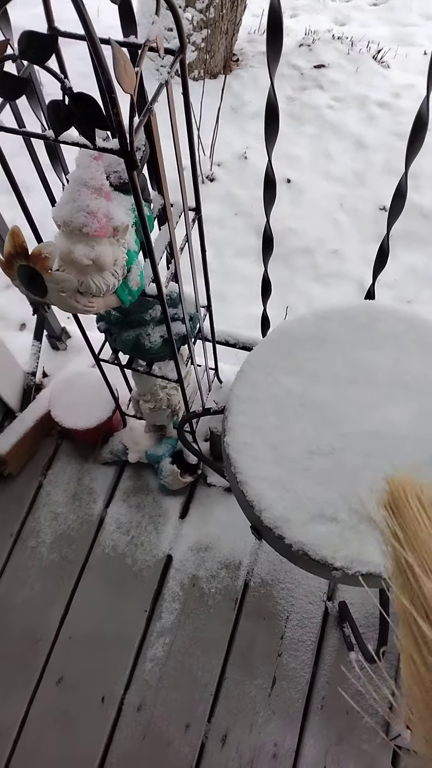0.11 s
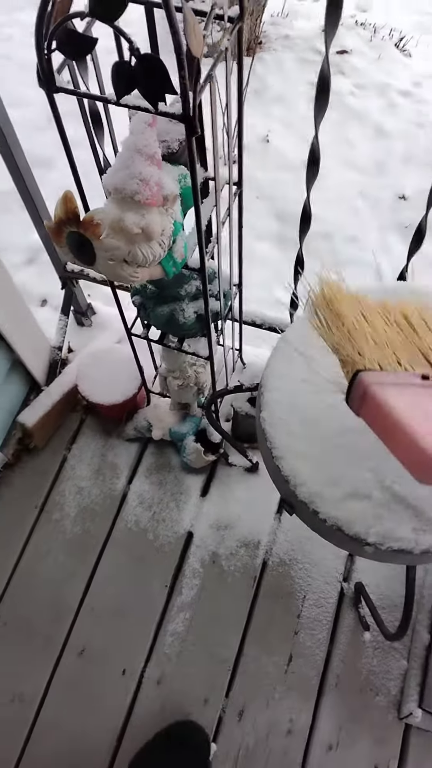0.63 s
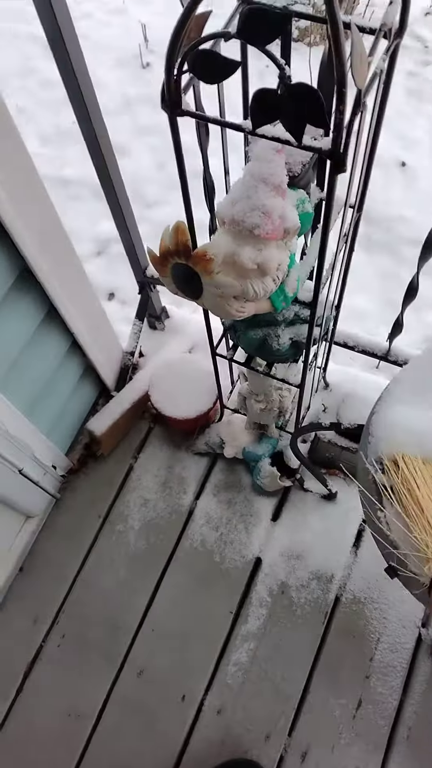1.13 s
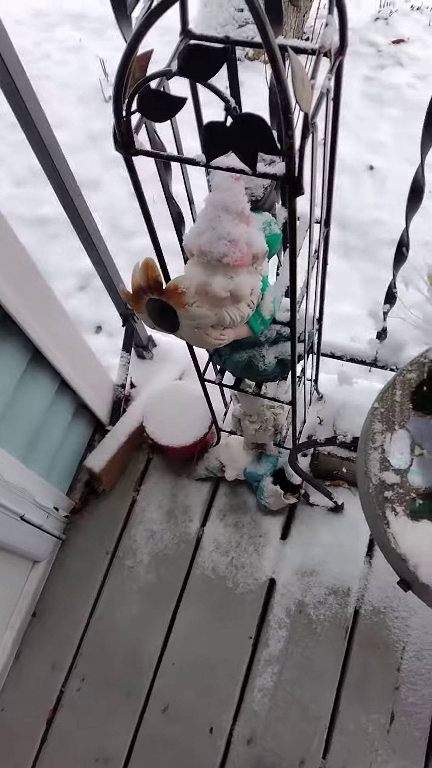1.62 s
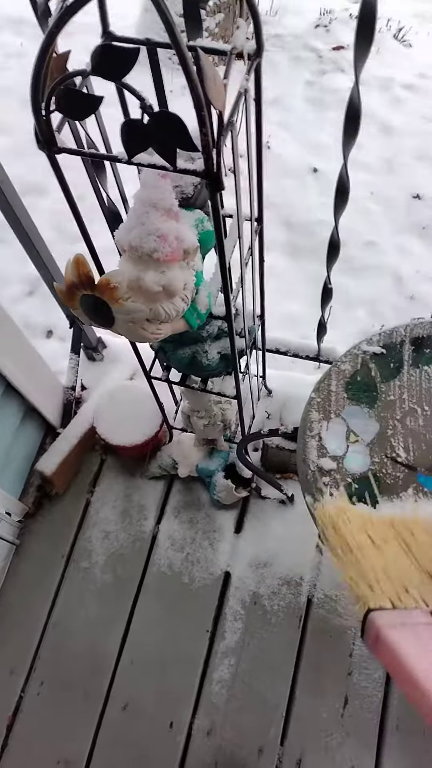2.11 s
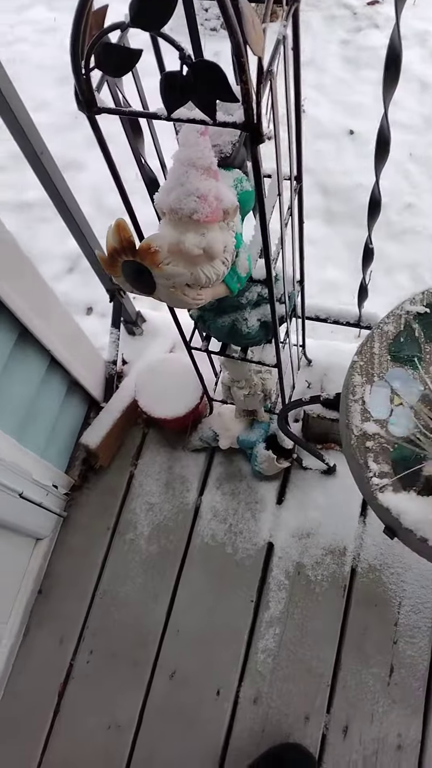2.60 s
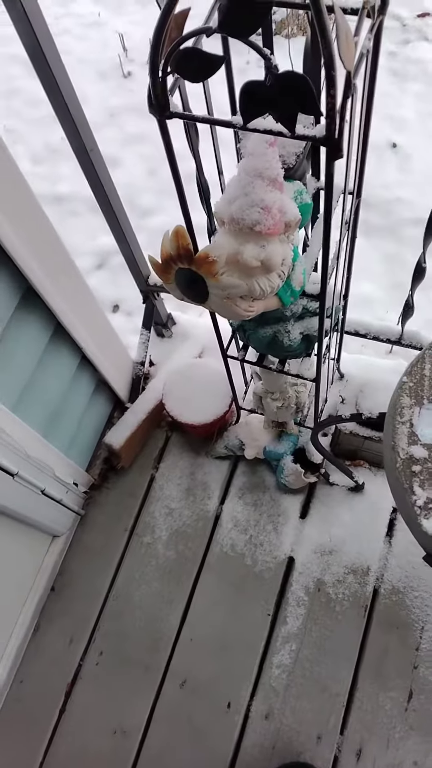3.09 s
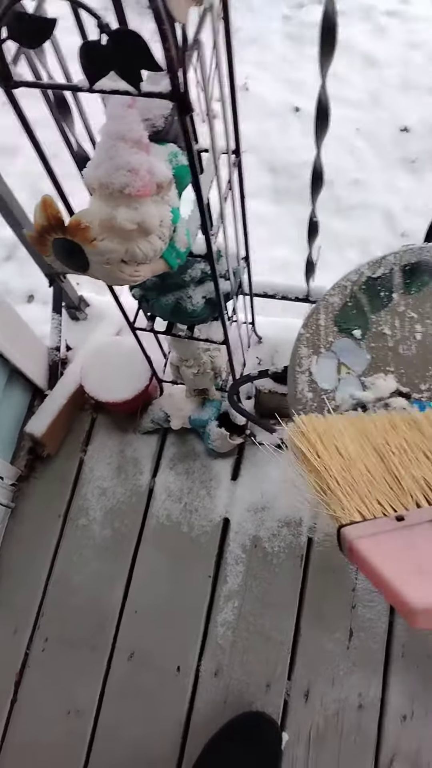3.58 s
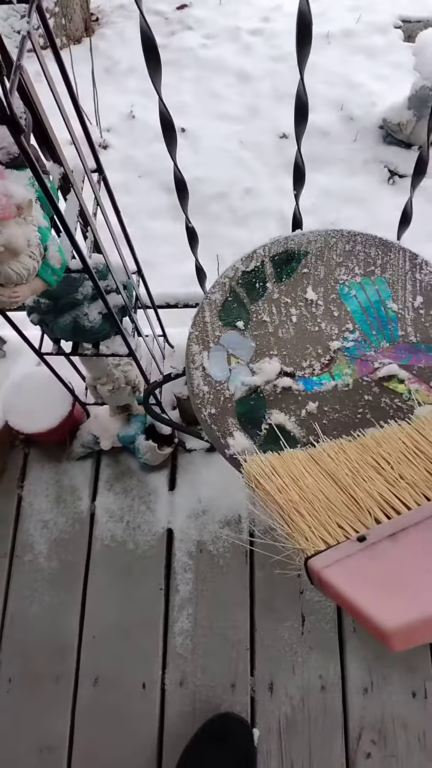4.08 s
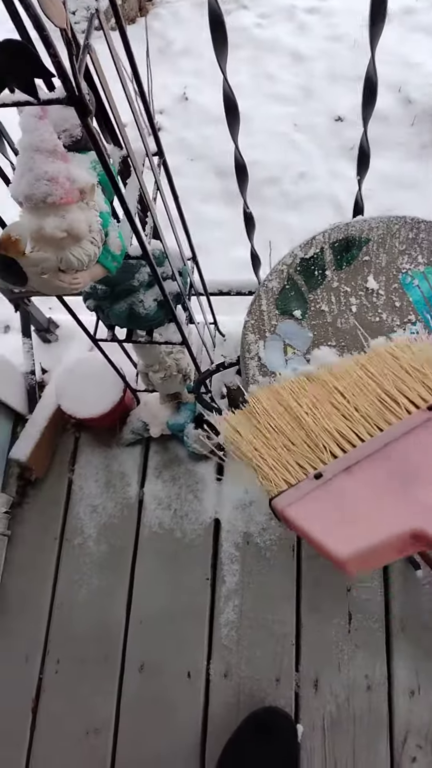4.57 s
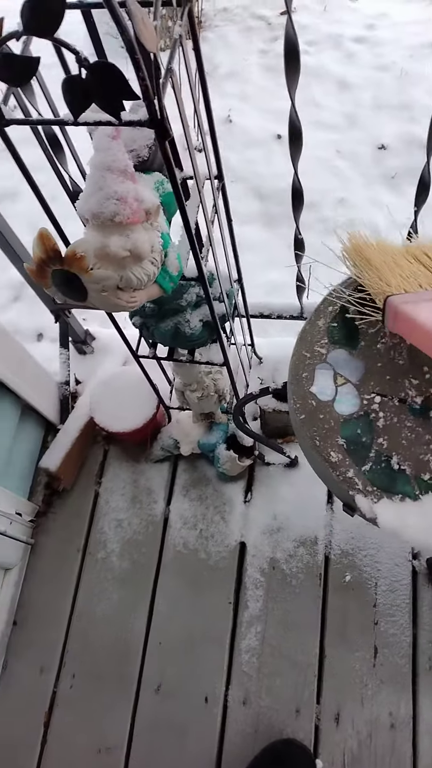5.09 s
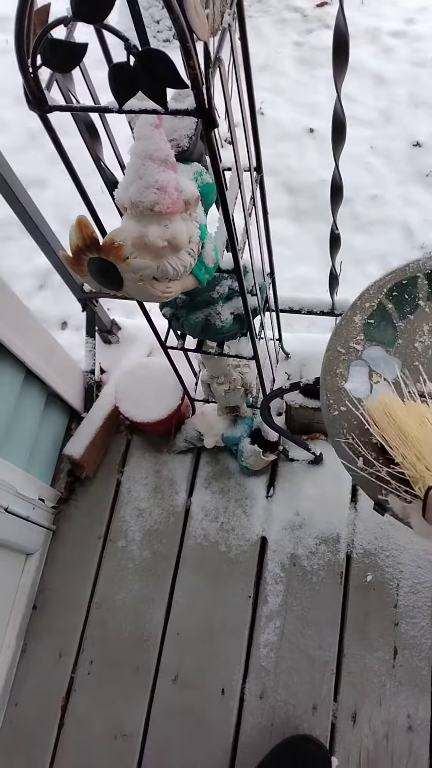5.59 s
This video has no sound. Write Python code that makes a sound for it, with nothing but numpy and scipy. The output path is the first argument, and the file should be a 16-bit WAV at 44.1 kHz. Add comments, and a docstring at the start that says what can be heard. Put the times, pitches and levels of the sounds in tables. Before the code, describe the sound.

Outdoors on a snowy wooden deck, heard close and dry through a stereo phone, over very quiet air and a faint wavering rumble. Straws barely rustle at first; a boot thuds softly on the boards at 0.6 s with a short snow scuff. From 0.9 s the broom brushes the table, building in uneven scratchy dabs to a sharp, crackling peak around 1.5 s, then dropping away by 1.7 s. A faint rasp begins near 2.1 s; the second sweep swells from 2.5 s, strongest around 2.9 s, with dull hollow tabletop knocks, snapping straws and a tiny falling squeak, fading by 3.2 s. Light soft dabs follow at 3.6 and 3.8 s. The third sweep runs from 4.3 to 5.1 s, a fuller steady hiss and snow crunch with a sharp snap at 4.75 s and a low puff of air, mostly left, near 5.0 s. A gentle flick comes at 5.5 s, with rustle rising at the end.

```python
"""On a wooden deck in winter, a straw broom sweeps snow off a small tiled metal table, at arm's length from a phone.
Thousands of random straw ticks make the hiss and the crunch of snow, coloured at each microphone port.
Drag and blows of the broom ring the modes of the table top; a foot rings those of the boards, its sole scuffing
snow. A puff of air reaches mostly the left port, straws squeak, and behind it lies a quiet, wavering rumble."""
import sys
import numpy as np
from scipy import signal
from scipy.fft import rfft, irfft
from scipy.io import wavfile
from scipy.ndimage import uniform_filter1d

SR = 44100
rng = np.random.default_rng(int(sys.argv[2]) if len(sys.argv) > 2 else 0)


def volts(x):
    """Linear amplitude factor 10**(x/20) for a level x in dB, scalar or array-like."""
    e = np.asarray(x, float) / 20
    return 10 ** e


def store_pcm(level_fs):
    """Save levels as 16-bit WAV."""
    pcm = np.round(np.clip(level_fs, -1, 1) * 32767).astype(np.int16)
    wavfile.write(sys.argv[1], SR, np.atleast_2d(pcm).T)


N = 251193

# Treble colour of the two microphone ports. Each row: frequency in Hz, left gain in dB, right gain in dB.
PORT_COLOUR = [(1800, -49, -50.5), (3293, -18, -18), (5056, -16, -14.5), (7060, -13.5, -8), (8014, -11, -8),
               (9940, -3.5, -8.5), (10920, 1, -13.5), (11640, -0.5, -11.5), (13290, -3, -26),
               (15590, -6.5, -15.5)]


def colour(x, hz, db):
    """Filter by a spectrum joined on a log-frequency axis."""
    log_hz = np.log(np.maximum(np.fft.rfftfreq(N, 1 / SR), 1))
    gain = volts(np.interp(log_hz, np.log(hz), db))
    return irfft(rfft(x) * gain, N)


def unit(x):
    """Scale so that the mean of the channels has rms 1."""
    middle = np.mean(np.atleast_2d(x), axis=0)
    return x / np.sqrt(np.mean(middle ** 2))


def curves(rows):
    """Columns of a table of times and values, joined by straight lines at every sample."""
    s, *columns = np.transpose(rows)
    return [np.interp(np.arange(N) / SR, s, column) for column in columns]


def walk(rate):
    """Random levels held 1 / rate s and slewed twice; spread near 1."""
    hold = int(SR / rate)
    steps = np.repeat(rng.standard_normal(N // hold + 1), hold)
    return 1.267 * uniform_filter1d(uniform_filter1d(steps, hold), hold)[:N]


def ring(x, hz, t60):
    """One mode: a decaying sine that falls 60 dB in t60 s after each push."""
    pole = np.exp(2j * np.pi * hz / SR - np.log(1000) / (t60 * SR))
    return signal.lfilter([1], [1, -pole], x).imag


def thumps(rows):
    """Soft, damped low rings."""
    out = 0
    for s, db, hz, t60 in rows:
        push = volts(db) * (np.arange(N) == int(s * SR))
        out = out + ring(push, hz, t60)
    return signal.sosfilt(signal.butter(3, (45, 850), "band", fs=SR, output="sos"), out)


def slips(count, scatter_db, lag_s):
    """Random ticks spread across the broom: each reaches the right port with its own lag."""
    at = rng.integers(0, N, count)
    spread = np.minimum(rng.exponential(size=count), 4)
    size = rng.standard_normal(count) * volts(scatter_db * spread)
    lag = np.round(lag_s * SR * rng.standard_normal(count)).astype(int)
    late = np.clip(at + lag, 0, N - 1)
    return np.array([np.bincount(k, size, N) for k in (at, late)])


def bunches(count, depth, fade_s):
    """Straws let go in bunches: sudden swells that die away."""
    size = np.minimum(rng.exponential(size=count), 3)
    kicks = np.bincount(rng.integers(0, N, count), size, N)
    return 1 + depth * signal.lfilter([1], [1, -np.exp(-1 / (fade_s * SR))], kicks)


def patchy(x, low_hz, count, patch_db, rate, favour_hz=1., favour_db=0.):
    """Uneven colour: each sixth-octave band of the straw and snow noise wavers on its own."""
    edges = low_hz * 2 ** (np.arange(count + 1) / 6)
    out = 0
    for lo, hi in zip(edges, edges[1:]):
        octaves_off = np.log2(np.sqrt(lo * hi) / favour_hz)
        lift_db = favour_db * np.exp(-(octaves_off / 0.197) ** 2)
        band = signal.sosfilt(signal.butter(1, (lo, hi), "band", fs=SR, output="sos"), x)
        out = out + volts(lift_db + patch_db * walk(rate)) * band
    return out


def through_ports(x):
    """Each port has its own treble resonance."""
    hz, *port_db = np.transpose(PORT_COLOUR)
    return np.array([colour(v, hz, db) for v, db in zip(x, port_db)])


def outdoors():
    """Still winter air, unrelated at the ports, with a wavering rumble mostly common to both."""
    # Spectrum of the still air. Each row: frequency in Hz, relative level in dB per Hz.
    air_colour = [(15, -23.5), (25, -0.5), (129, -5.5), (250, -8), (330, -4), (480, -16.5), (690, -3.5),
                  (850, -5.5), (1020, -21.5), (1230, -5.5), (1600, -13), (2100, -15), (2380, -11),
                  (2800, -16), (5280, -75.5), (9810, -22.5), (11500, -23.5), (15500, -58)]
    # Distant low rumble. Each row: time in seconds, level in dB about which it wavers.
    rumble_level = [(0, -75.5), (.2, -78.5), (.35, -71), (.57, -74), (1.22, -77), (1.62, -72), (2.1, -69.5),
                    (2.35, -75.5), (2.66, -68.5), (3.27, -77), (3.66, -70.5), (4.4, -81.5), (5.12, -70.5),
                    (5.7, -78.5)]
    air = colour(rng.standard_normal((2, N)), *np.transpose(air_colour))
    left = colour(air[0], [6000, 12000], [0, 3])
    right = colour(air[1], [6000, 12000], [0, -9])
    low = colour(rng.standard_normal((3, N)), [20, 45, 75, 120, 160, 210, 290],
                 [-26, 6.5, 10, 8, 4.5, 0.5, -29.5])
    shared = unit(low[0] + 0.19 * low[1:])  # each port adds a little rumble of its own
    rumble = shared * volts(curves(rumble_level)[0] + 2.0 * walk(7.9))
    return volts(-77) * unit(np.array([left, right])) + rumble


def puff():
    """Eddies of air from the swing: short, unsteady low rings, mostly at the left port."""
    # Bursting eddies. Each row: start in seconds, level in dB before flutter and port share, pitch in Hz.
    eddies = [(4.962, -40, 89), (4.991, -32.5, 115), (4.993, -37.5, 264), (5.024, -42, 100),
              (5.012, -37.5, 187), (5.043, -38, 125.7), (5.07, -45, 80), (5.1, -41, 87.3)]
    cycles = 10.0  # turns until 60 dB down
    rings = thumps([(s, db, hz, cycles / hz) for s, db, hz in eddies])
    return np.array([[.9], [.1]]) * rings * volts(2.0 * walk(90))


def thuds():
    """Deck boards ring under a foot, alike at both ports."""
    # Heel, rocking sole and toe. Each row: start in seconds, level in dB, brightness in dB per octave.
    steps = [(.622, -43.5, 5), (.637, -45.5, 0.5), (.65, -53.5, -3.5), (.668, -62, -1.5), (.7, -72, -7),
             (.735, -77, -10), (.764, -73, -11.5), (.792, -73, -10.5)]
    # Modes of the deck boards. Each row: frequency in Hz, relative level in dB, 60 dB decay in seconds.
    board = [(93.5, -3, 0.1), (134.6, -5, 0.101), (359.4, -12, 0.23), (394.4, -1, 0.103),
             (631.4, 1, 0.0544), (225, -9, 0.07), (500, -9, 0.06)]
    rows = []
    for s, db, tilt_db in steps:
        for hz, mode_db, t60 in board:
            octaves = np.log2(hz / board[3][0])
            rows.append((s, db + mode_db + tilt_db * octaves, hz, t60))
    return thumps(rows)


def scuffs():
    """Grains of snow crushed under the sole on the boards."""
    # Grinding of the sole. Each row: start in seconds, peak level in dB, seconds to fall 20 dB.
    grinds = [(.44, -70.5, .5), (.621, -54.5, 0.12), (.7, -72.5, 0.04)]
    # Spectrum of the grinding. Each row: frequency in Hz, relative level in dB per Hz.
    grind_colour = [(60, -12.5), (150, -9.5), (400, 0), (800, -8.5), (1500, -16), (3500, -15),
                    (6000, -24.5)]
    t = np.arange(N) / SR
    ticking = slips(count=20000, scatter_db=2.0, lag_s=.0001)
    grains = unit(colour(ticking, *np.transpose(grind_colour)))
    return grains * sum(volts(db - 20 * np.maximum(t - s, 0) / fall_s) * (t > s) for s, db, fall_s in grinds)


def squeak():
    """A bundle of straws squeaks on the glaze: a rough falling whistle, nearer the right port."""
    # Path of the whistle. Each row: time in seconds, pitch in Hz, level in dB, before roughness and port share.
    whistle = [(2.85, 7800, -70), (2.875, 7600, -39.5), (2.9, 7474, -41.5), (2.92, 7060, -44),
               (2.94, 7000, -66)]
    hz, db = curves(whistle)
    rough_hz = hz * (1 + 0.031 * walk(400))
    tone = np.sin(2 * np.pi * np.cumsum(rough_hz) / SR)
    sounding = np.abs(np.arange(N) / SR - 2.895) < .045
    return np.array([[.8], [1.2]]) * volts(db + 2.69 * walk(250)) * tone * sounding


def drags():
    """The broom edge drags through crust: grains break in one narrow band whose pitch glides."""
    # Narrow rasps. Each row: start and end in seconds, level at start and end in dB, pitch at start and end in Hz.
    rasps = [(2.08, 2.32, -76, -71, 1903, 2050), (3.05, 3.318, -66.5, -81.5, 1892, 1800),
             (4.059, 4.319, -74, -67, 1815, 1931)]
    t, out = np.arange(N) / SR, 0
    half_width_hz = 140  # the grains, slowed to this, spread either side of the gliding pitch
    low_pass = signal.butter(2, half_width_hz, fs=SR, output="sos")
    grains = signal.sosfilt(low_pass, slips(count=6000, scatter_db=2.0, lag_s=0.00106))
    for start, end, db0, db1, hz0, hz1 in rasps:
        turn = 2 * np.pi * np.cumsum(np.interp(t, (start, end), (hz0, hz1))) / SR
        fade = np.clip(np.minimum(t - start, end - t) / 0.06, 0, 1)
        level = volts(np.interp(t, (start, end), (db0, db1)))
        out = out + fade * level * np.cos(turn)
    return np.sqrt(2) * unit(grains) * out


def table(hum_db, under_hz, swell):
    """Dragging straws and blows ring the same table modes; both favour those near the spot they touch."""
    # Blows of the broom head. Each row: time in seconds, relative level in dB, pitch in Hz the struck spot favours.
    knocks = [(.97, -27, 435), (1.178, -33, 504), (1.249, -41.5, 763), (1.288, -39.5, 449),
              (1.459, -27.5, 615), (1.474, -25.5, 580), (1.504, -31, 540), (1.541, -33, 640),
              (2.422, -40.5, 522), (2.459, -44.5, 536), (2.498, -39.5, 930), (2.557, -35.5, 880),
              (2.572, -35.5, 480), (2.62, -27.5, 439), (2.649, -25, 489), (2.653, -32, 942),
              (2.696, -29.5, 500), (2.75, -34.5, 577), (2.83, -29.5, 551), (2.84, -33, 523),
              (2.862, -35, 557), (2.893, -24, 542), (2.914, -24, 558), (2.95, -34, 510), (2.993, -28, 552),
              (3.499, -48.5, 499), (3.557, -37, 510), (3.572, -39, 491), (3.729, -42, 472),
              (4.335, -41, 654), (4.385, -35.5, 682), (4.4, -36, 930), (4.65, -35.5, 930),
              (4.734, -34.5, 588), (4.878, -32, 580), (4.951, -30.5, 597), (5.636, -34.5, 482)]
    # Table top modes, damped by tile and snow. Each row: frequency in Hz, relative level in dB, t60 in seconds.
    modes = [(339, -37, 0.12), (392.3, -17.5, 0.08), (464, -1.5, 0.0593), (520.8, -4, 0.0665),
             (580, -5, 0.0724), (631, -0.5, 0.0757), (687.1, -2, 0.0665), (836.8, -0.5, 0.0424),
             (871.2, -3.5, 0.0557), (925.6, 1.5, 0.0607), (988, -10.5, 0.085), (1260.4, -7.5, 0.203),
             (2020, -14.5, .06), (2775, -5.5, 0.04)]
    contact_ms = 3.22
    drag = slips(count=40000, scatter_db=1.5, lag_s=0.000183) * swell
    rattle = slips(count=1800, scatter_db=2.0, lag_s=0.0001)  # sparse harder straw hits
    drag = drag / drag.std() + volts(-9.5) * rattle / rattle.std()
    drag = drag / drag.std() * volts(hum_db)
    click = np.eye(1, 9000)[0]
    response = sum(volts(db) * ring(click, hz, t60) for hz, db, t60 in modes)
    norm = np.sqrt(np.sum(response ** 2))
    sides = np.sign(rng.standard_normal((len(knocks), len(modes))))  # which side of each nodal line is struck
    size = int(contact_ms * SR / 1000)
    out = 0
    for (hz, db, t60), side in zip(modes, sides.T):
        off_spot_db = np.minimum(20 * np.log2(hz / under_hz) ** 2, 10)
        force = drag / norm * volts(2.0 - off_spot_db + 2.4 * walk(30))
        # the springy head feeds the mode
        push = np.hanning(size) * np.cos(2 * np.pi * hz * np.arange(size) / SR) * 4 / size
        for (s, blow_db, spot_hz), sign in zip(knocks, side):
            i = int(s * SR) - size // 4
            blow = volts(blow_db - 9.0 - 97 * np.log2(hz / spot_hz) ** 2)
            force[:, i:i + size] += sign * blow * push
        out = out + volts(db) * ring(force, hz, t60)
    # a small unbaffled plate radiates no bass
    return signal.sosfilt(signal.butter(4, 320, "high", fs=SR, output="sos"), out)


def ticks(hiss_db):
    """Tips flicking the tile ring a few cycles; the ports share each as they share the hiss of that pitch."""
    # The distinct flicks. Each row: time in seconds, level in dB, pitch in Hz, 60 dB decay in milliseconds.
    flicks = [(.3447, -52, 11800, 4), (.4921, -41, 12000, 9), (1.1051, -31, 10500, 2.5),
              (1.126, -39, 11300, 8), (1.172, -36, 11000, 4), (1.2065, -30, 11300, 6),
              (1.5042, -21.5, 10900, 7), (1.6207, -34, 10300, 10), (1.9384, -39, 10300, 4),
              (2.0523, -35, 3500, 1.2), (2.9293, -23, 11000, 4), (3.1893, -43, 10900, 5),
              (3.3035, -52, 9820, 5), (4.2873, -40, 10600, 5), (4.7552, -24, 11300, 6),
              (4.8385, -29, 10600, 4), (5.2336, -47, 11600, 5), (5.3354, -51, 11400, 4),
              (5.3603, -54, 11500, 4)]
    out = np.zeros((2, N + 600))
    hz, left_db, right_db = np.transpose(PORT_COLOUR)
    small = []  # lesser flicks at random times, set 5 dB or more above the hiss level
    for u, p, z in zip(rng.random(250), rng.random(250), rng.exponential(size=250)):
        db = hiss_db[int(u * N)] + 5 + 2.5 * min(z, 3)
        small.append((u * N / SR, db, 9000 + 5000 * p, 4.0))
    for s, db, tip_hz, t60_ms in small + flicks:
        right = volts(np.interp(tip_hz, hz, right_db - left_db))
        share = np.array([[2], [2 * right]]) / (1 + right)
        i = int(s * SR)
        out[:, i:i + 600] -= share * volts(db) * ring(np.eye(1, 600)[0], tip_hz, t60_ms / 1000)
    return out[:, :N]


def snaps(hiss_db):
    """Stiff straws snap free: each a sharp tick and a few ms of scattering."""
    # The loudest snaps. Each row: start in seconds, level in dB before colouring, relative level of the low part in dB.
    loudest = [(.4945, -47, -28.5), (.9088, -38, -12), (.9242, -36.5, -6), (.9562, -29, -8),
               (1.105, -37, -23.5), (1.2053, -30, -19), (1.2465, -25.5, -22.5), (1.3898, -30, -11),
               (1.474, -22, -18.5), (1.503, -19, -17), (1.5177, -23, -26), (1.537, -23.5, -25.5),
               (1.5775, -22.5, -24.5), (1.6205, -30, -26), (1.8605, -43, -23.5), (2.0525, -44, -1.5),
               (2.396, -32.5, -20.5), (2.5547, -25.5, -10), (2.592, -25.5, -19), (2.6287, -26, -19),
               (2.6493, -22.5, -20), (2.7113, -25, -9.5), (2.7454, -24.5, -15.5), (2.77, -25, -26.5),
               (2.8327, -21.5, -13), (2.8884, -20, -17.5), (2.915, -22.5, -20), (2.9278, -23, -21),
               (2.977, -26, -15), (3.0739, -30.5, -21), (4.0473, -44, -24.5), (4.3276, -25.5, -17.5),
               (4.5844, -30.5, -21), (4.7542, -21, -14), (4.8383, -26.5, -12), (5.1023, -31, -14),
               (5.459, -35, -22.5)]
    burst, low = np.zeros((2, 2, N + 1500))
    ms = np.arange(1500) / SR * 1000
    small = []  # lesser snaps at random times, their level following the hiss
    for u, z in zip(rng.random(70), rng.standard_normal(70)):
        small.append((u * N / SR, hiss_db[int(u * N)] + 7 + 2.0 * z, -17.5))
    for s, db, low_db in small + loudest:
        hiss = np.sign(rng.standard_normal((3, 1500)))
        decay = np.exp(-ms / 0.16) + 0.5 * np.exp(-ms / 3.47)
        shape = volts(db) * decay * (1 - np.exp(-ms / 0.643))
        i = int(s * SR)
        burst[:, i:i + 1500] += shape * hiss[:2]
        low[:, i:i + 1500] += volts(low_db) * shape * (hiss[2] + 0.76 * hiss[:2])  # partly common to the ports
    treble = 3.2 * through_ports(burst[:, :N])
    return treble + colour(low[:, :N], [250, 500, 5500, 8000], [-17.5, 7.5, -0.5, -33])


def straws(hiss_db, crunch_db, rasp_hz, swell):
    """Tips tick on tile and pack the snow, both swelling bunch by bunch."""
    # Spectrum of the snow crunch. Each row: frequency in Hz, relative level in dB per Hz.
    crunch_colour = [(600, -5), (1100, -1.5), (1600, -6), (2000, -3), (2800, -2), (3800, -1), (7000, -4)]
    tip_ticks = slips(count=200000, scatter_db=2.6, lag_s=.0002)
    grit = slips(count=100000, scatter_db=1.9, lag_s=.00011)
    # the rasp is more coloured where crunch is strong against the hiss, as in light scraping
    rasp_db = 7 + 0.737 * (crunch_db + 10)
    tips = patchy(tip_ticks * swell, 2136, count=18, patch_db=3.0, rate=40)
    snow = patchy(grit * swell ** 0.643, 816, count=16, patch_db=3.5, rate=35,
                  favour_hz=rasp_hz, favour_db=rasp_db)
    hiss = through_ports(tips)
    crunch = colour(snow, *np.transpose(crunch_colour))
    return volts(hiss_db) * (unit(hiss) + volts(crunch_db) * unit(crunch))


def sweep():
    """Levels of the broom: strokes, dabs and rustle add in power to hiss, crunch and hum, the last two re hiss."""
    # Three long strokes, trailing off as loose snow slides. Each row: time in seconds, straw hiss in dB,
    # snow crunch relative to hiss in dB, table hum relative to hiss in dB.
    strokes = [
        [(.87, -65, -22, -22.5), (.93, -58.5, -10.5, -11.5), (1.09, -59, -6.5, -6.5), (1.12, -49, -8, -10.5),
         (1.33, -46, -10, -11.5), (1.44, -44, -9, -9), (1.47, -40.5, -8.5, -7.5), (1.52, -41, -11, -14),
         (1.56, -45.5, -11.5, -9.5), (1.59, -46, -13, -12), (1.612, -55, -10, -10), (1.7, -61.5, -6.5, -5),
         (1.76, -72.5, -9, -12.5)],
        [(2.05, -65, -4, -2), (2.14, -62.5, -0.5, -2), (2.2, -53, -9, -3.5), (2.33, -53, -7.5, -13),
         (2.44, -52.5, -10.5, -10), (2.53, -44.5, -11.5, -9.5), (2.57, -40, -9.5, -8.5), (2.68, -43, -8, -4.5),
         (2.92, -35, -12, -13.5), (2.97, -43, -6.5, -9.5), (3.05, -42.5, -12, -14.5), (3.16, -57, -2.5, -2.5),
         (3.3, -64, -7.5, -4), (3.46, -75, -7.5, -5)],
        [(4.05, -70.5, -5.5, -16), (4.17, -63.5, -4, -14.5), (4.3, -50.5, -9.5, -12), (4.35, -45.5, -6, -6),
         (4.385, -40, -8.5, -9), (4.5, -39.5, -11, -9.5), (4.66, -37, -10, -9.5), (4.73, -44, -10, -12.5),
         (4.82, -43.5, -11.5, -12), (4.87, -40, -10.5, -12), (4.96, -41, -11.5, -8.5), (5.06, -50.5, -9.5, -8),
         (5.16, -61, -7, -8.5), (5.25, -69, -8.5, -10.5)],
    ]
    # Straws rustling while the broom is lifted or carried. Each row: time in seconds, hiss in dB.
    rustle = [(0, -69.5), (.1, -80.5), (.17, -90.5), (.3, -70), (.47, -69.5), (.6, -61), (.78, -71.5),
              (.86, -62), (1, -67), (1.76, -64.5), (1.97, -59.5), (2.15, -64.5), (3.46, -80), (3.7, -63),
              (3.96, -60), (4.15, -66), (5.2, -64.5), (5.3, -68.5), (5.42, -71), (5.56, -59), (5.7, -55)]
    # Tips brush the table briefly, or dig in during a stroke. Each row: peak time in seconds, hiss in dB,
    # seconds to rise 20 dB, seconds to fall 20 dB, crunch relative to hiss in dB.
    dabs = [(.497, -59, 0.012, 0.2244, -8.5), (.97, -42, 0.0566, 0.15, -10.5),
            (1.207, -40.5, 0.012, 0.04, -14.5), (1.25, -41, 0.006, 0.05, -14),
            (1.39, -40.5, 0.0675, 0.0536, -12.5), (1.58, -39.5, 0.0409, 0.0517, -15),
            (1.635, -47, 0.02, 0.06, -17), (2.47, -44.5, 0.0547, .15, -17.5),
            (3.0, -40, 0.0383, 0.1217, -15), (3.561, -46.5, 0.0785, 0.14, -12),
            (3.615, -50.5, 0.1032, 0.09, -9.5), (3.83, -47, 0.1622, 0.18, -16.5),
            (4.05, -54.5, 0.08, 0.22, -16), (4.33, -42.5, 0.0263, 0.0321, -13),
            (4.765, -39.5, 0.025, 0.1121, -11.5), (5.105, -43, 0.0661, 0.0555, -19.5),
            (5.468, -47, 0.03, 0.19, -13)]
    t = np.arange(N) / SR
    hiss = volts(curves(rustle)[0]) ** 2
    crunch = hiss * volts(-15.5) ** 2
    for s, db, rise_s, fall_s, crunch_db in dabs:
        power = volts(db - 20 * np.maximum((s - t) / rise_s, (t - s) / fall_s)) ** 2
        hiss = hiss + power
        crunch = crunch + power * volts(crunch_db) ** 2
    hum = crunch * volts(1.5) ** 2  # only the tips touch
    for stroke in strokes:
        db, crunch_db, hum_db = curves(stroke)
        power = volts(db) ** 2 * (t > stroke[0][0]) * (t < stroke[-1][0])
        hiss = hiss + power
        crunch = crunch + power * volts(crunch_db) ** 2
        hum = hum + power * volts(hum_db) ** 2
    return 10 * np.log10([hiss, crunch / hiss, hum / hiss])


def scene():
    """Broom, table, feet and air as they reach the two ports."""
    # Where the broom bears down. Each row: time in seconds, table pitch favoured under it in Hz,
    # pitch of its rasp on snow in Hz.
    touch = [(0, 710, 2370), (.3, 553, 1400), (.5, 403, 1600), (1.05, 464, 1544), (1.4, 520, 1554),
             (1.5, 599, 1570), (1.8, 690, 1450), (2.08, 448, 1895), (2.25, 593, 2020), (2.65, 563, 1463),
             (2.9, 570, 1900), (3.12, 852, 1760), (3.35, 804, 1750), (3.55, 507, 1390), (4.05, 643, 1850),
             (4.28, 606, 2010), (4.4, 675, 1478), (4.9, 586, 1906), (5.25, 495, 1410), (5.46, 894, 1800),
             (5.55, 890, 1800), (5.7, 480, 1740)]
    hiss_db, crunch_db, hum_db = sweep()
    under_hz, rasp_hz = curves(touch)
    swell = bunches(count=600, depth=0.24, fade_s=0.0067)
    facing = volts(np.array([[.6], [-.6]]))  # the left port faces the table top
    background = outdoors() + puff()
    foot = thuds() + scuffs()
    top = facing * table(hiss_db + hum_db, under_hz, swell)
    broom = straws(hiss_db, crunch_db, rasp_hz, swell) + snaps(hiss_db) + ticks(hiss_db)
    return background + foot + squeak() + drags() + top + broom


def top_cut(x):
    """Nothing passes above the cut-off."""
    return signal.sosfilt(signal.butter(12, 16510, fs=SR, output="sos"), x)


def record(dry):
    """The phone cuts the top steeply above 15650 Hz."""
    cut = signal.sosfilt(signal.ellip(10, .2, 70, 15650, fs=SR, output="sos"), dry)
    return top_cut(cut)


dry = scene()
out = record(dry)
store_pcm(out)
```